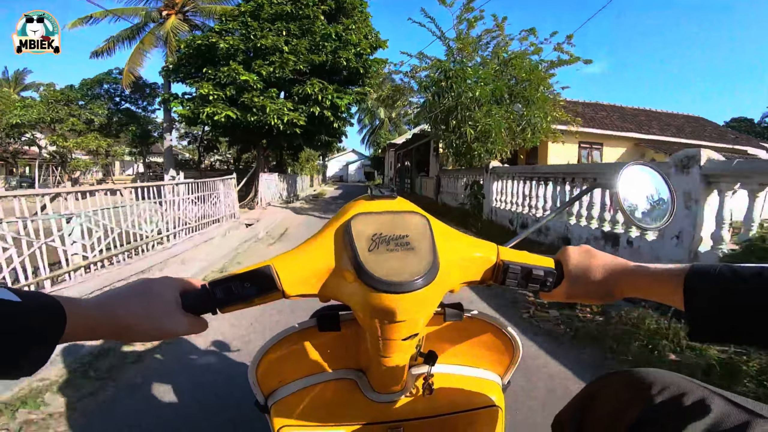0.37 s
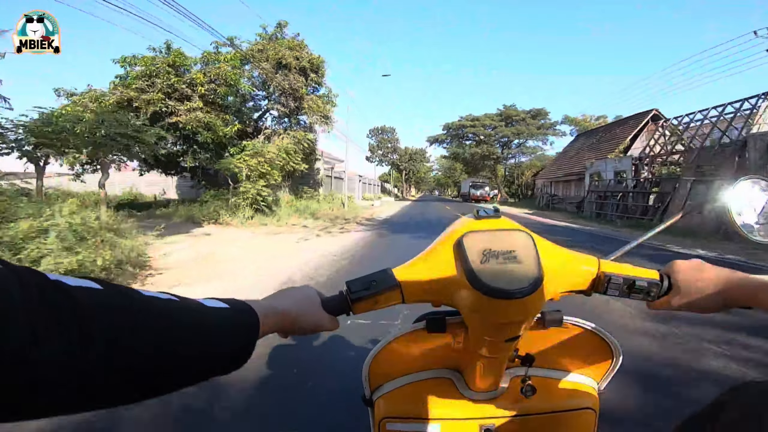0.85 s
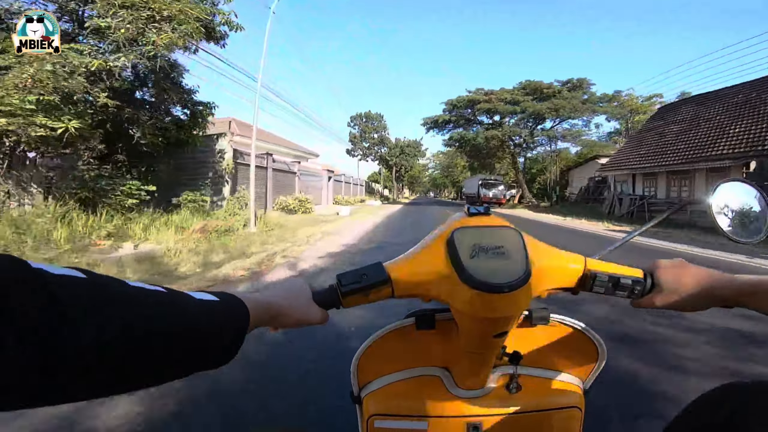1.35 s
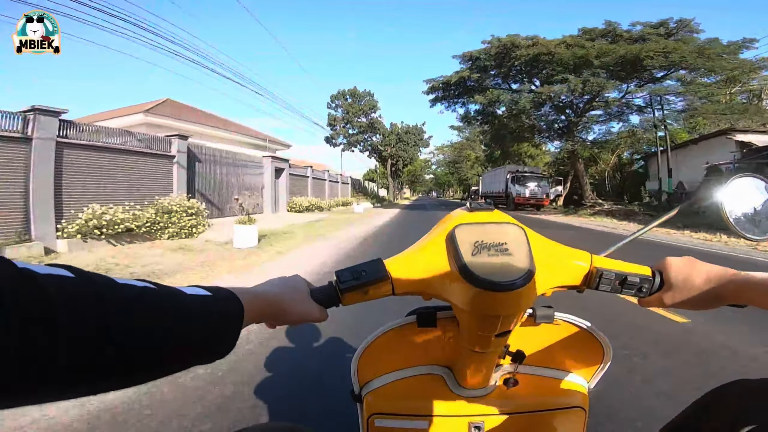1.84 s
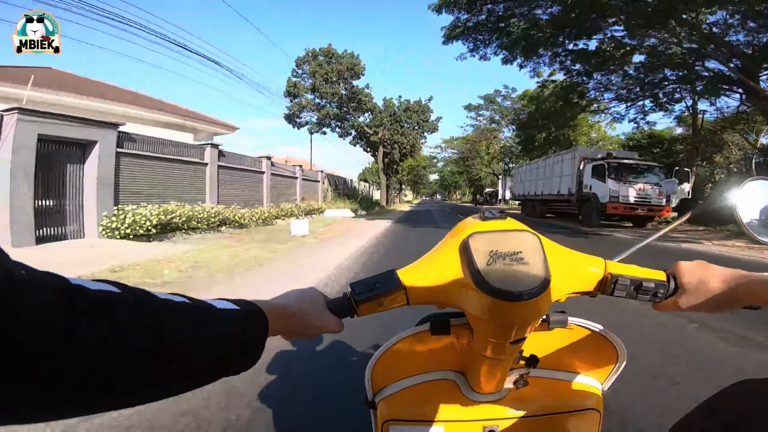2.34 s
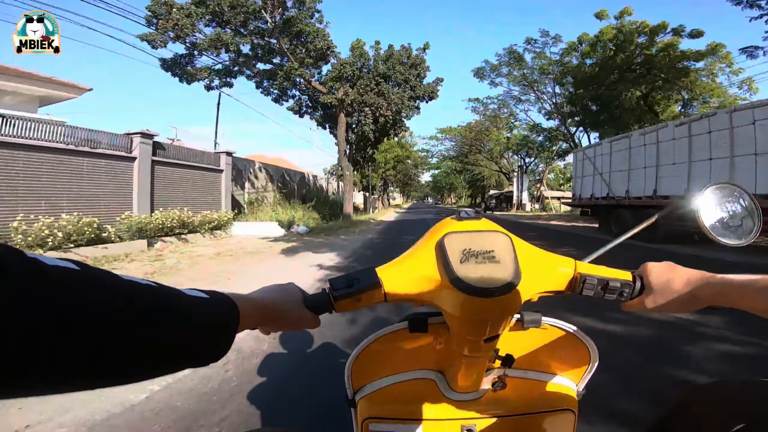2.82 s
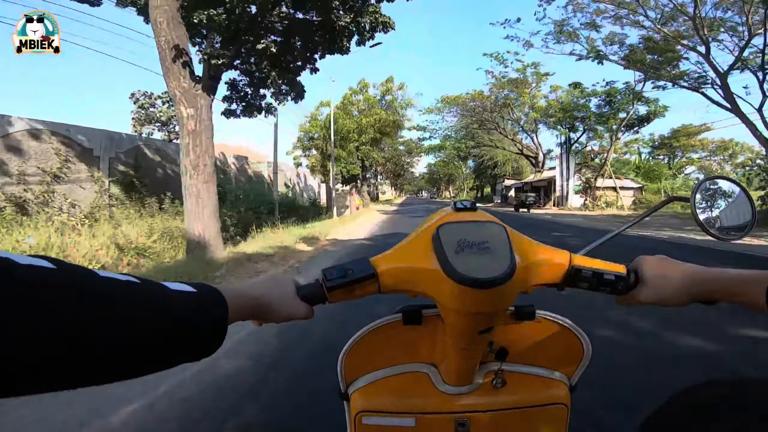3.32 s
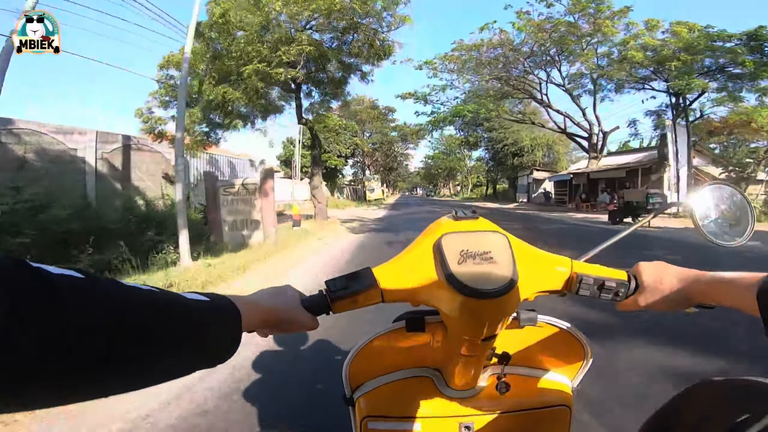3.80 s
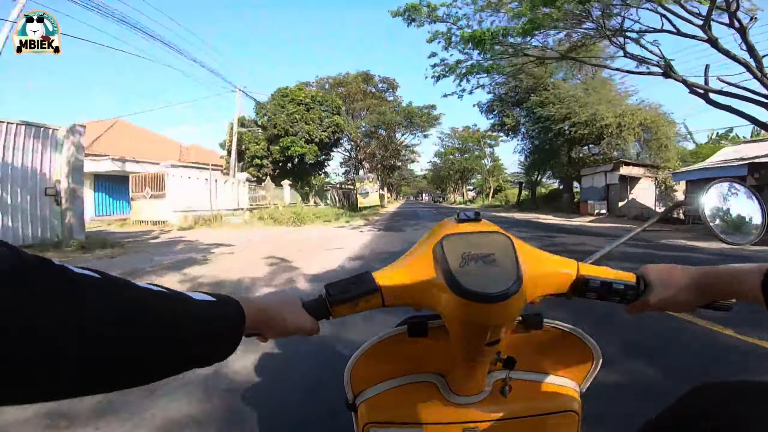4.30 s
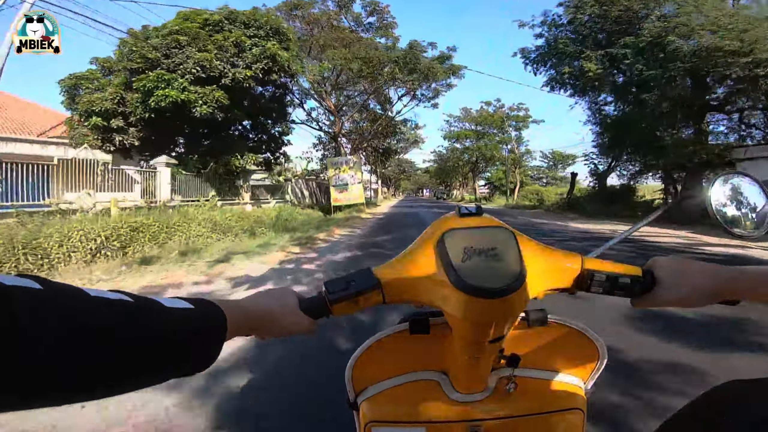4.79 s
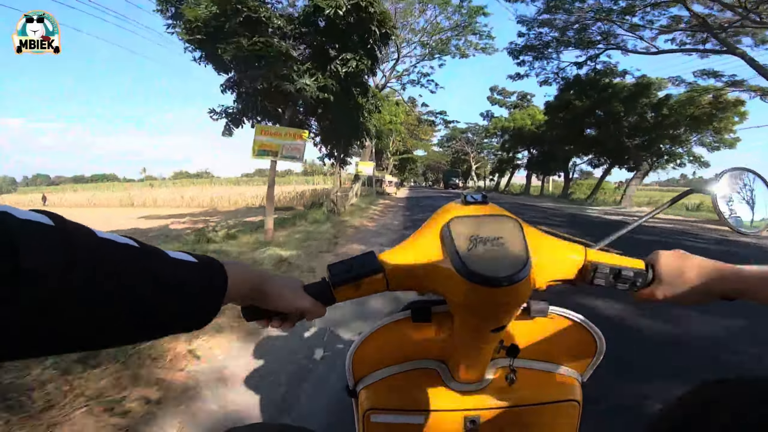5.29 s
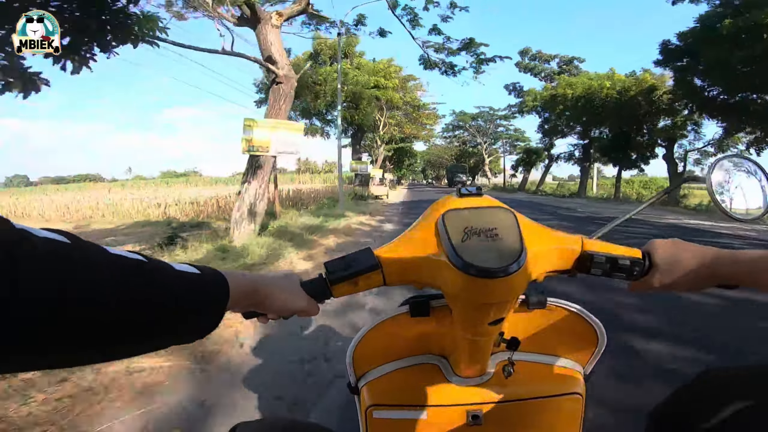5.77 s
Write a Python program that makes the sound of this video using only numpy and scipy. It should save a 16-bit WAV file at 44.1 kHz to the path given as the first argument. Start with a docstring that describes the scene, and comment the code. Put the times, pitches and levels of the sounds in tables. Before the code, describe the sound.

Low, lumpy scooter exhaust jumps with a click to a loud, droning hum, metal panels chattering over wind hiss and shuddering road noise.

```python
"""On the road, at a rider's chest: a small two-stroke scooter fires slowly and unevenly; then the scene changes
twice, each time abruptly with a click, to two stretches of the scooter cruising. Sine waves on multiples of the
firing rate make the exhaust hum. Filtered pulses make hard firings and their pipe echoes, and noise bursts once
a firing make the loose tinware clatter. Resonant noise and a shuddering sine wave give frame rumble, and shaped
noise the road roar; faint tones come and go."""
import sys
import numpy as np
from scipy import signal
from scipy.fft import rfft, irfft, next_fast_len
from scipy.io import wavfile
from scipy.ndimage import uniform_filter1d, map_coordinates

SR = 44100
rng = np.random.default_rng(int(sys.argv[2]) if len(sys.argv) > 2 else 0)


def transcribe(signal):
    """Save signal, clipped to [-1, 1], as a 16-bit WAV file at the path in sys.argv[1]."""
    frames = np.atleast_2d(signal).T
    limited = np.clip(frames, -1, 1)
    pcm = np.round(limited * 32767).astype(np.int16)
    wavfile.write(sys.argv[1], SR, pcm)


def ratio_of_db(decibels):
    """Turn decibels (scalar or array-like) into linear amplitude factors; 0 dB maps to 1."""
    return 10 ** (np.asarray(decibels, float) / 20)


N = 260190
T = np.arange(N) / SR  # time of every sample, in seconds


def unit(x):
    """Scales a sound to rms 1."""
    return x / np.sqrt(np.mean(x ** 2) + 1e-20)


def along(points, hz):
    """Reads each column after the Hz on a logarithmic pitch axis."""
    f, *columns = np.transpose(points)
    return [np.interp(np.log(hz + 1), np.log(f + 1), column) for column in columns]


def curves(tables):
    """Draws each column after the time as a curve with one value per sample."""
    s, *columns = np.transpose(np.concatenate(tables))
    return [np.interp(T, s, column) for column in columns]


def wobble(rate):
    """Draws a smooth random curve with `rate` random points a second."""
    points = rng.standard_normal(int(N * rate / SR) + 4)
    return map_coordinates(points, [np.arange(N) * rate / SR])


def filtered(x, response):
    """Multiplies the spectrum of x by a complex response of frequency."""
    m = next_fast_len(N + SR // 2)
    return irfft(rfft(x, m) * response(np.fft.rfftfreq(m, 1 / SR)), m)[..., :N]


def resonant(modes):
    """Response of parts that ring after a push; neighbours take opposite signs."""
    def response(f):
        total = 0
        for k, (centre, width, db) in enumerate(modes):
            total = total + (-1) ** k * ratio_of_db(db) * 1j * f * width / (centre ** 2 - f ** 2 + 1j * f * width)
        return total
    return response


def noise(spectrum, envelope, patchy_db):
    """Three patchy noises under one envelope: one for both ports, one for each port alone."""
    z = signal.stft(rng.standard_normal((3, N)), nperseg=512)[2]
    patches = uniform_filter1d(rng.standard_normal(z.shape[1:]), size=6, axis=0)
    patches = uniform_filter1d(patches, size=10, axis=1)
    rows = signal.istft(z * ratio_of_db(patchy_db * unit(patches)), nperseg=512)[1][:, :N]
    return unit(filtered(rows * envelope, lambda hz: ratio_of_db(along(spectrum, hz)[0])))


def band(modes, envelope):
    """Three noises that ring in the given bands, scaled to rms 1."""
    rows = rng.standard_normal((3, N)) * envelope
    return unit(filtered(rows, lambda hz: sum(resonant([mode])(hz) ** 2 for mode in modes)))


# The slow stretch and the two cruising ones: start_s, end_s
STRETCHES = [(0, .474), (.475, 4.857), (4.858, 5.9)]


def stretch_now():
    """Numbers the stretch at every sample, and marks the slow one."""
    stretch = np.searchsorted([start for start, end in STRETCHES], T, side="right") - 1
    return stretch, T < STRETCHES[0][1]


# Engine speed, one list a stretch: time_s, firings_per_s
SPEED = [
    [(0, 54.6), (.474, 54.5)],
    [(.475, 83.4), (1.4, 84.4), (3, 85.6), (3.6, 86.5), (4.857, 85.6)],
    [(4.858, 83.1), (5.4, 82.5), (5.9, 82.4)],
]


def firing_rate():
    """The engine's firings per second; the beat of hum and clatter follows from it."""
    return curves(SPEED)[0]


# Steady levels, one row a stretch, roar and clatter before their mix offsets:
# second_multiple_db, rumble_db, roar_db, clatter_db
LEVELS = [(-27.5, -27, -41.5, -42), (-20, -19.5, -39, -39), (-21, -19.5, -37.5, -40.5)]
# Bumps of the narrow lane: time_s, strength (0-1)
BUMPS = [(.08, 0.65), (.22, 0.8), (.34, 0.8), (.45, 0.95)]
# Size of a slow random drift, drawn separately for each: rumble_db, roar_db, clatter_db
DRIFT_DB = (-1, 0.95, 0.27)


def levels(firing_hz):
    """Note, rumble, roar and clatter levels: steady, then moved by throb, bumps, revs and road surface."""
    stretch, _ = stretch_now()
    note_db, *ride_db = np.array(LEVELS)[stretch].T
    # at low speed the note throbs every 0.121 s and sinks 8 dB a second
    throb_db = 3.5 * np.cos(2 * np.pi * (T - .08) / .121) - 8 * T
    bump_s = 0.031  # from a bump's top to 37 % of its strength
    bump = sum(size * np.exp(-((T - s) / bump_s) ** 2) for s, size in BUMPS)
    rise_db = (5.5, 1, 6)  # on a full bump: rumble, roar, clatter
    moved_db = [db + rise * bump + drift * wobble(1.84)
                for db, rise, drift in zip(ride_db, rise_db, DRIFT_DB)]
    rumble_db, roar_db, clatter_db = moved_db
    cruise_hz, db_per_hz = 85.8, 0.72  # in the first cruise the tinware clatters more as revs climb
    clatter_db = clatter_db + (stretch == 1) * db_per_hz * (firing_hz - cruise_hz)
    return note_db + (stretch == 0) * throb_db, rumble_db, roar_db, clatter_db


# Exhaust note, one list a stretch, only the balance counting: multiple of the firing rate, level_db
NOTES = [
    [(1, -9), (2, -8), (3, -6.5), (4, -9), (5, -4), (6, -13.5), (7, -15.5), (8, -23), (9, -23.5), (10, -28),
     (11, -26.5), (12, -33), (13, -49)],
    [(1, -5.5), (2, 2.5), (3, -10), (4, -6.5), (5, -20.5), (6, -18), (7, -23), (8, -21), (9, -28),
     (10, -30), (11, -25.5), (12, -34), (13, -27.5)],
    [(1, -7.5), (2, 2), (3, -10.5), (4, -7.5), (5, -19), (6, -19), (7, -20.5), (8, -24.5), (9, -26.5),
     (10, -26), (11, -26), (12, -29), (13, -46)],
]
# Narrow body resonances that lift a multiple passing them: pitch_hz, half_width_hz, lift_db
BOOMS = [(333.6, 5.7, 3), (413.2, 11.8, 10.5), (755.6, 15, 10)]


def hum(turns, note_db):
    """Exhaust pulses add up to multiples of the firing rate, higher ones less steady; gear teeth whine."""
    stretch, slow = stretch_now()
    firing_hz = np.gradient(turns) * SR
    out = np.zeros(N)
    for k in range(len(NOTES[0])):
        multiple = k + 1
        balance_db = np.array([note[k][1] - note[1][1] for note in NOTES])[stretch]
        boom_db = sum(db / (1 + ((multiple * firing_hz - hz) / w) ** 2) for hz, w, db in BOOMS)
        level_db = uniform_filter1d(balance_db + boom_db, size=130)
        waver = min(multiple, 9)
        phase = 2 * np.pi * (multiple * turns + rng.random()) + .05 * waver * wobble(60)
        swell_db = .18 * waver * wobble(25) + .1 * waver * wobble(1.5)
        out += ratio_of_db(level_db + swell_db) * np.sin(phase)
    teeth = 21  # tooth contacts per firing
    mesh = np.sin(2 * np.pi * teeth * turns + 1.1 * wobble(45))
    mesh = mesh * ratio_of_db(np.minimum(2.5 * wobble(20), 2))
    whine = ratio_of_db(-33.5) * ~slow * mesh
    return np.sqrt(2) * ratio_of_db(note_db) * (out + whine)


# Hard firings at low speed, some with a pipe echo 11 ms later; the loudest sets the scale: time_s, peak_db
POPS = [(0.069, -5), (0.087, -7), (0.11, -11), (0.197, -9), (0.2155, -7), (0.226, -9), (0.291, -10),
        (0.3245, -3), (0.335, -9), (0.364, -9), (0.382, -9), (0.401, -12), (0.435, -3.5), (0.446, -8)]
# Colour of a hard firing: pitch_hz, level_db
PIPE = [(150, 3), (300, 1), (450, -1), (600, -8), (800, -19), (1200, -30), (2500, -56)]
# Colour of the gas noise after a hard firing: pitch_hz, level_db (per Hz)
PUFF_COLOUR = [(300, -30), (600, 3), (1100, -2), (1600, -26), (3000, -60)]
# Leg shield panel resonances: pitch_hz, width_hz, level_db
SHIELD = [(672, 53, -11), (717, 25, -3.5)]


def pops(turns, roar_db):
    """Hard firings and pipe echoes thud and puff at low speed; uneven firings always drum on the leg shield."""
    fired = np.flatnonzero(np.diff(np.floor(turns)))
    lumps_db = 2.5 * wobble(10)
    uneven, hard = np.zeros(N), np.zeros(N)
    uneven[fired] = rng.standard_normal(len(fired)) * ratio_of_db(roar_db[fired] + 57.0 + lumps_db[fired])
    for s, db in POPS:
        hard[round(s * SR)] = ratio_of_db(db)

    def drum_response(hz):
        soft = 1 / (1 + 1j * hz / 900) ** 3  # gas pulses have no sharp edge
        return soft * resonant(SHIELD)(hz)

    drum = filtered(uneven, drum_response)
    pipe = [(11, -43), *PIPE, (6000, -120)]
    thud = filtered(hard, lambda hz: ratio_of_db(along(pipe, hz)[0]))
    puff_s = 0.0028  # decay time
    puff_shape = filtered(hard, lambda hz: 1 / (1 + 2j * np.pi * hz * puff_s)) * SR * puff_s
    puff = puff_shape * noise(PUFF_COLOUR, 1, patchy_db=-1.5)[0]
    return drum + thud * hard.max() / thud.max() + ratio_of_db(-30) * puff


# Colour of a rattle: pitch_hz, level_db (per Hz)
KICK = [(800, -43), (1800, 2.5), (3000, -0.5), (4000, -10.5), (5000, -3.5), (7000, -3), (10000, -27),
        (15000, -61)]
# Ringing modes of the tinware, only the balance counting: pitch_hz, width_hz, level_db
RINGS = [(3500, 40, -2), (3770, 30, -3), (5420, 60, -6), (6210, 40, 0), (6410, 18, 1), (6870, 30, -3),
         (7200, 25, -6)]
# Colour of the wind hiss when cruising: pitch_hz, level_db (per Hz)
HISS = [(710, -34), (1200, -3.5), (1830, -3.5), (1990, -6), (2440, -9), (3840, -5.5), (4690, -11.5),
        (5270, -6.5), (6310, -6.5), (8570, -18), (9520, -18.5), (11900, -30.5), (13500, -34), (14400, -37),
        (15000, -63)]
# Colour of the wind hiss at low speed: pitch_hz, level_db (per Hz)
SLOW_HISS = [(710, 0.5), (1200, 3), (1650, -8), (3240, 1.5), (4790, -8), (6720, -12.5), (9320, -17),
             (10800, -26), (13600, -52), (15000, -48)]


def clatter(turns, level_db):
    """Each firing kicks loose tinware, harder at two points of the wheel's turn; modes sing over wind hiss."""
    _, slow = stretch_now()
    cycle = np.floor(turns).astype(int)
    wheel = 2 * np.pi * turns / 10.6  # firings per turn of the wheel
    bump = np.cos(2 * wheel + 1.2 * wobble(2)) + 0.5 * np.cos(wheel + 0.6 * wobble(2))
    kick_db = 6.8 * rng.standard_normal(N)[cycle] + 4 * bump + 0.65 * wobble(20.0)
    kick_shape = ratio_of_db(np.minimum(kick_db, 7.5)) * np.exp(-(turns - cycle) / 0.13)
    gentle_db = -4 * slow  # kicks and ringing are gentler at low speed
    kicks = ratio_of_db(level_db - 10 + gentle_db) * unit(kick_shape)
    # contacts build up over a millisecond
    rattle = noise(KICK, 1, patchy_db=1.5) * uniform_filter1d(kicks, size=40)

    ring = np.zeros((3, N))
    for mode in RINGS:
        source = ratio_of_db(1.9 * wobble(6.6)) * rng.standard_normal((3, N))
        ring += filtered(source, lambda hz: resonant([mode])(hz) / (1 + ((hz - mode[0]) / 300) ** 2))
    ring = ratio_of_db(level_db - 11.5 + gentle_db) * unit(ring)

    hiss = np.where(slow, noise(SLOW_HISS, 1, patchy_db=1.3), noise(HISS, 1, patchy_db=1.0))
    hiss_db = level_db - 1.5 + 0.41 * wobble(8.4) + 0.36 * bump
    return rattle + ratio_of_db(hiss_db) * hiss + ring


# Loudest single rattles, level before a common 5.5 dB cut: time_s, level_db, pitch_hz
KNOCKS = [(0.042, -29.5, 3770), (0.167, -29, 3250), (0.185, -28, 2300), (0.2356, -27, 2530),
          (0.2802, -28, 2820), (0.2934, -29, 3590), (0.3263, -33, 2450), (0.4263, -38, 3670),
          (0.491, -24, 2890), (0.5281, -20, 3040), (0.6833, -30.5, 3630), (0.923, -27, 4060),
          (1.029, -31, 3680), (1.1376, -26, 4030), (1.7985, -25, 3530), (1.858, -25, 2250),
          (1.953, -31.5, 3200), (1.9768, -27, 2310), (2.0472, -34, 3760), (2.164, -27.5, 3850),
          (2.188, -29, 3700), (2.2, -29, 3700), (2.247, -27, 2800), (2.445, -30, 3330), (2.459, -31, 3700),
          (2.6356, -30, 3770), (2.762, -26.5, 3730), (3.126, -29, 3780), (3.254, -24.5, 3700),
          (3.3815, -26, 2970), (3.5208, -24, 3600), (3.625, -24, 3580), (3.7523, -28, 3700),
          (3.8114, -27, 3860), (3.961, -27, 3070), (4.0541, -27, 3630), (4.066, -30, 3750),
          (4.1349, -30, 4040), (4.2652, -24, 2500), (4.518, -33, 3960), (4.5535, -28, 3800),
          (4.576, -24.5, 3750), (4.681, -29, 3900), (4.694, -25, 3880), (4.7524, -24, 3560),
          (4.8222, -27, 2890), (4.8827, -26, 3650), (5.0633, -30, 3640), (5.076, -33, 3800),
          (5.0885, -32, 3900), (5.099, -29, 3950), (5.39, -28, 4050), (5.28, -24, 2350),
          (5.6864, -36, 2600), (5.7667, -27, 3850), (5.85, -31, 4020), (5.877, -29, 2270)]


def knocks():
    """Loose parts knock once: a quick broad crack, with a short ring if near the chattering part's pitch."""
    out = np.zeros((3, N + SR))
    life = np.arange(SR // 50) / SR
    shape = np.exp(-life / 0.0026) * (1 - np.exp(-life / 0.00029))  # decay and onset in seconds
    crack = np.pad(noise(KICK, 1, patchy_db=-2), ((0, 0), (0, SR)))
    for s, db, hz in KNOCKS:
        span = slice(round(s * SR), round(s * SR) + len(life))
        rough = 1 + .8 * unit(uniform_filter1d(rng.standard_normal((3, len(life))), size=12))
        pitched = 1 / (1 + ((hz - 3840) / 450) ** 2)
        ring = pitched * rough * np.sin(2 * np.pi * (hz * life + rng.random()))
        out[:, span] += ratio_of_db(db - 5.5) * shape * (ring + ratio_of_db(-1) * crack[:, span])
    return out[:, :N]


# Level of the chattering part: time_s, level_db
CHATTER = [(.48, -56), (1.5, -50), (2.2, -54), (3.2, -51), (4, -51), (4.6, -56), (4.85, -52.5), (5, -53),
           (5.9, -48.5)]
# Tinware modes that stand out at low speed, only the balance counting: pitch_hz, width_hz, level_db
SLOW_RINGS = [(2510, 170, 1), (3270, 200, -.5), (5700, 300, -3), (6660, 300, -2)]
# Brief swells of the treble: time_s, half_length_s, level_db
SWELLS = [(0.349, 0.025, -43.5), (0.452, 0.023, -41)]


def chatter(turns):
    """A loose part chatters in fits once a firing; tinware rings at low speed; the treble swells briefly."""
    _, slow = stretch_now()
    strokes = np.exp(-(turns % 1) / 0.3)
    fits = unit(ratio_of_db(np.minimum(3 * wobble(9) + 3 * wobble(70), 4)) * strokes)
    level_db, = curves([CHATTER])
    part = ratio_of_db(level_db) * ~slow * band([(3840, 1080, 0)], fits)  # Hz, width in Hz, dB
    rings = ratio_of_db(-54 + np.minimum(4 * wobble(30), 4)) * slow * band(SLOW_RINGS, 0.28 + strokes)
    swell = sum(ratio_of_db(db) * np.exp(-((T - s) / half) ** 2) for s, half, db in SWELLS)
    return part + rings + swell * band([(6260, 2300, 0)], 1)


# Frame and mount shaken by the road, only the balance counting: pitch_hz, width_hz, level_db
FRAME = [(29.9, 6.5, -4.5), (51, 12.7, -1.5), (76, 47, -11.5)]


def rumble(level_db):
    """The road shakes frame and mount at their lowest resonances, with a wandering shudder at the lowest."""
    def response(hz):
        return resonant(FRAME)(hz) * hz ** 2 / (hz ** 2 + 18 ** 2) / (1 + (hz / 400) ** 2)

    shaking = unit(filtered(rng.standard_normal(N), response))
    shudder_hz = 28.5 + 1.64 * wobble(5)
    shudder = ratio_of_db(3.2 * wobble(7) - 1) * np.sin(2 * np.pi * np.cumsum(shudder_hz) / SR)
    return ratio_of_db(level_db) * (0.96 * shaking + 1.22 * shudder)


# Colour of the roar, only the balance counting: pitch_hz, level_db (per Hz)
ROAR = [(35, -8), (60, 0.5), (120, -7), (200, -10.5), (300, -12.5), (450, -16.5), (620, -21.5), (850, -29),
        (1050, -31), (1400, -34.5), (2500, -43.5), (5500, -120)]


def roar(turns, level_db):
    """Tyres, wind and exhaust jet make broad noise that breathes with each firing."""
    breath = 1 + 0.25 * np.cos(2 * np.pi * turns)
    return ratio_of_db(level_db + 16.5 + .4 * wobble(5)) * noise(ROAR, breath, patchy_db=.7)


# Brief faint tones, level before a random wobble: start_s, end_s, pitch_hz, level_db
TONES = [(.41, .474, 958, -39), (5.2, 5.78, 3133, -54.5)]


def tones():
    """Faint sine waves of nearly steady pitch swell and stop."""
    out = np.zeros(N)
    for start, end, hz, db in TONES:
        swell = np.clip((T - start) / (end - start), 0, 1) ** .5
        stop = np.clip((end - T) / .004, 0, 1)
        wave = np.sin(2 * np.pi * hz * T + .5 * wobble(20))
        out += np.sqrt(2) * ratio_of_db(db + wobble(15)) * swell * stop * wave
    return out


# The two microphone ports: pitch_hz, left_minus_right_db, left_lead_radians, likeness of noise (0-1)
PORTS = [(30, -1.7, -.15, 1), (150, -5, -.15, .98), (330, -7.5, .1, .95), (480, -9.5, .9, .7),
         (750, -1, 2.6, .85), (950, -4, 3, .75), (1400, -7, 1.8, .45), (2300, -6, -.8, .2),
         (3000, -4, .8, .5), (3800, -1.5, .2, .85), (4700, -6, -.4, .35), (6200, -12.5, -1.1, .45),
         (8500, -1, -2.5, .25), (11000, -4, -2.5, .1), (15000, -1, -2.5, .1)]


def ports(rows, coherent):
    """Left and right hear through the rider's shadow; for noise their mean keeps the source's level."""
    m = 2 * N  # mirrored at the end, so that the edges do not click
    balance_db, lead, alike = along(PORTS, np.fft.rfftfreq(m, 1 / SR))
    gain = ratio_of_db(np.array([balance_db, -balance_db]) / 2)
    mean = np.sqrt((gain[0] ** 2 + gain[1] ** 2 + 2 * alike * np.cos(lead)) / 4)
    z = rfft(np.hstack([rows, rows[:, ::-1]]))
    heard = z[0] * np.exp(.5j * np.array([lead, -lead]))
    if not coherent:
        heard = np.sqrt(alike) * heard + np.sqrt(1 - alike) * z[1:]
    return irfft(heard * gain / mean, m)[:, :N]


def scene():
    """Tonal parts, pops and rumble reach the ports as one wave, differing in level and phase; the rest partly."""
    firing_hz = firing_rate()
    note_db, rumble_db, roar_db, clatter_db = uniform_filter1d(np.array(levels(firing_hz)), size=130)
    turns = np.cumsum(firing_hz) / SR  # firings so far
    one_wave = hum(turns, note_db) + pops(turns, roar_db) + rumble(rumble_db) + tones()
    partly_shared = clatter(turns, clatter_db) + knocks() + chatter(turns) + roar(turns, roar_db)
    return ports(one_wave[None], True) + ports(partly_shared, False)


# Clicks where the stretches meet: time_s, left_step, right_step (full scale is 1)
JUMPS = [(0.47461, -.3, -.54), (4.85795, .24, .52)]


def clicks():
    """A sudden step, with a quick build-up before it and a decay after it, at each jump."""
    out = np.zeros((2, N))
    for s, left, right in JUMPS:
        step = np.where(T >= s, .5, -.5) * np.exp(-np.abs(T - s) / .0018)
        out += np.outer([left, right], step)
    return out


def roll_off(x):
    """The treble ends steeply here."""
    return signal.sosfilt(signal.butter(12, 16430, fs=SR, output="sos"), x)


def record(dry):
    """The band is limited, quick gain control evens out swells, peaks are rounded and the jumps click."""
    limit_hz = 15100
    spectrum = rfft(np.hstack([dry, dry[:, ::-1]]))
    x = irfft(spectrum * (np.fft.rfftfreq(2 * N, 1 / SR) < limit_hz), 2 * N)[:, :N]
    power = np.abs(uniform_filter1d(np.mean(x ** 2, axis=0), size=1500))
    usual = np.abs(uniform_filter1d(power, size=22000))
    x = x * ((usual + 1e-9) / (power + 1e-9)) ** .22
    x = x / (1 + np.abs(x / .85) ** 4) ** .25  # the highest peaks are rounded off
    return roll_off(x + clicks())


dry = scene()
out = record(dry)
transcribe(out)
```